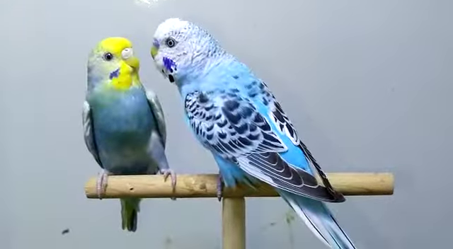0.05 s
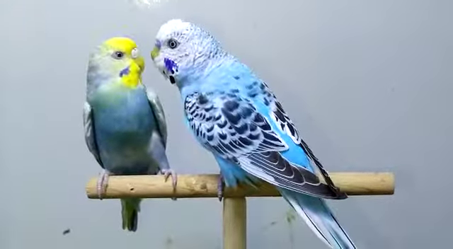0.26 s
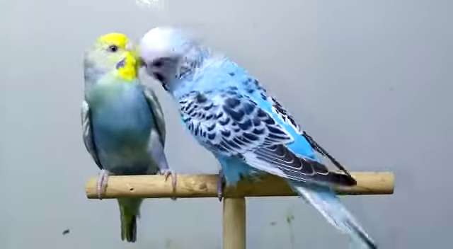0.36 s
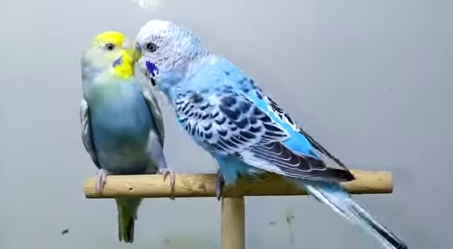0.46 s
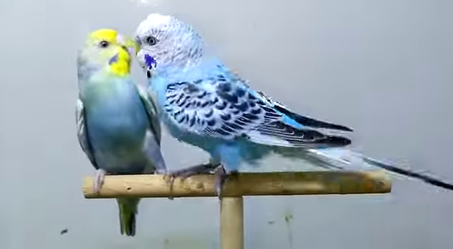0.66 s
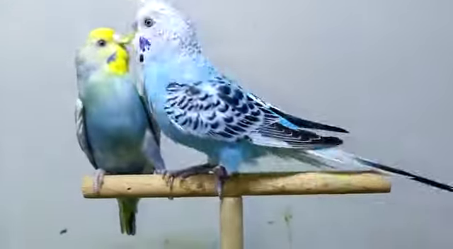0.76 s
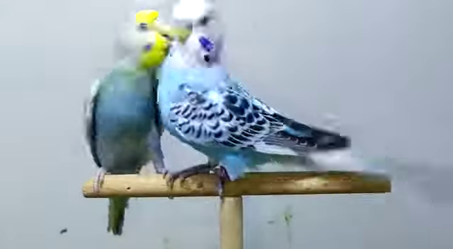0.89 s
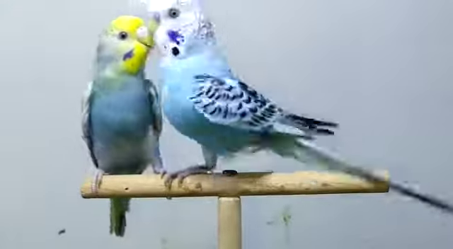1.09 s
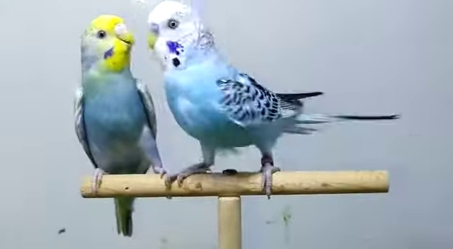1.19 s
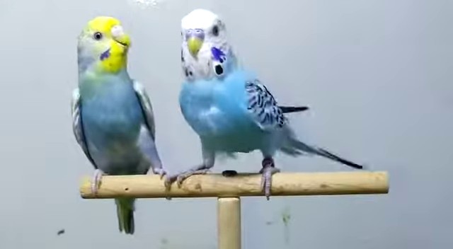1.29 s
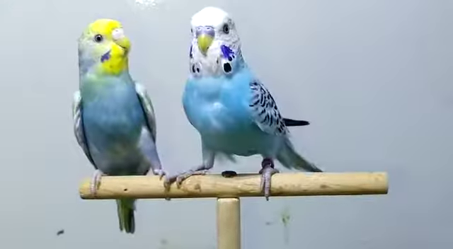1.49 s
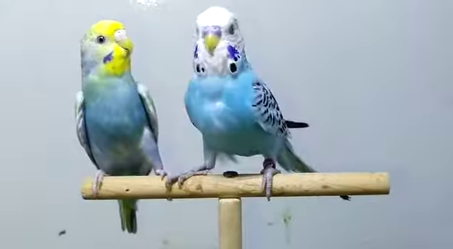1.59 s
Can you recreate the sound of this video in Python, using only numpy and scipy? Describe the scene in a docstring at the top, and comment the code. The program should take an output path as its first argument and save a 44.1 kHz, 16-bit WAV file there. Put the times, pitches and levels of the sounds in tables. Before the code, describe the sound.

A budgerigar squawks once loudly amid soft chirps, over a low uneven rumble.

```python
"""Two budgerigars in a bare room

Two birds court on a perch, each voice driven by the vibrating membrane of its syrinx. One close
squawk overloads the input; softer chirps and warbles arrive mostly as reverberation. Feathers
rustle, claws and beaks tick, and an uneven rumble with low thumps buffets mainly the left microphone."""
import sys
import numpy as np
from scipy import signal
from scipy.fft import rfft, irfft, next_fast_len
from scipy.io import wavfile
from scipy.ndimage import uniform_filter1d

SR = 44100
rng = np.random.default_rng(int(sys.argv[2]) if len(sys.argv) > 2 else 0)


def unload_wav(signal):
    """Save mono or channel-first audio to the path in sys.argv[1] as 16-bit WAV at rate SR, clipped to [-1, 1]."""
    wavfile.write(
        sys.argv[1],
        SR,
        np.round(np.clip(np.atleast_2d(signal).T, -1, 1) * 32767).astype(np.int16),
    )


N = 72765
LEAD = int(.2 * SR)  # lead-in, so that the room already rings at time zero
T = np.arange(-LEAD, N) / SR
BUFFET_RIGHT_DB = -19  # rumble and thumps, right against left


def squawk():
    """Nonlinear oscillation: a close call leaps between harmonic tones, period doubling and rasp."""
    # Course of the call: time_s, pitch_hz, first_db, second_db, third_db (harmonics), roughness
    contour = [(0.387, 2750, -22, -19.5, -20.5, .4), (0.397, 2758, -16, 1.5, 0.5, 0.05),
               (0.404, 2771, -7.5, 7, -5.5, 0.13), (.411, 3044, -21, -5.5, 1.5, 0.1),
               (0.426, 3309, -17, -3.5, -30, 0.3), (0.43, 3344, 5.5, -25, -20, 0),
               (.438, 3840, -2.5, -0.5, -23, .3), (.451, 3593, 4, -19, -11.5, 1.19),
               (0.459, 2745, -7.5, -6, -17, 0.31), (0.47, 2823, -10, -8.5, -5.5, 0.1),
               (.481, 2640, -1, -3, -7.5, 0.7), (0.485, 3771, 8, -20, -25.5, 0.42),
               (.491, 3505, 5, -27.5, -18.5, 0), (0.5, 3677, -2.5, -12.5, -30, 0),
               (.502, 2702, -9, -10.5, -21.5, 0.29), (.521, 3130, 0.5, -26.5, -11, 0.04),
               (0.545, 3329, 3, -15, -6, .15), (0.55, 3635, 4, -4.5, -29.5, 1.11),
               (0.555, 3462, -3, -29.5, -49.5, 0.92), (0.566, 3230, -8.5, -33, -38.5, .7)]
    # Breaks to half pitch: centre_s, length_s, level_db against the fundamental
    breaks = [(.493, .021, -8)]
    # Partials of a break: pitch_multiple, level_db
    break_partials = [(.5, 0), (1.5, -10), (2.5, -3)]
    # Spectrum of the breath noise: frequency_hz, level_db
    rasp_spectrum = [(1100, -25), (1700, -10), (3600, 3.5), (4900, -7.5), (8500, 4), (10800, -18.5),
                     (14000, -31.5), (16000, -23.5)]
    hz, first_db, second_db, third_db, roughness = in_time(contour)
    phase, strength = syrinx(hz, roughness)
    fundamental = from_db(first_db) * np.sin(phase)
    fourth_db = third_db - 25.5
    overtones = sum(from_db(db) * np.sin(k * phase)
                    for k, db in enumerate([second_db, third_db, fourth_db], 2))
    break_level = sum(from_db(first_db + db) * swell(centre - length / 2, length, edge_s=length / 2)
                      for centre, length, db in breaks)
    half_pitch = break_level * sum(from_db(db) * np.sin(k * phase) for k, db in break_partials)
    start, end = contour[0][0], contour[-1][0]
    envelope = from_db(-5) * swell(start, end - start, edge_s=.0088)
    voice = envelope * (place(strength * fundamental, pan_db=-5, lag_s=.000125)
                        + place(strength * (overtones + half_pitch), pan_db=1, lag_s=.00017))
    voice_level = envelope * np.hypot(from_db(first_db), from_db(second_db))
    rasp_level = from_db(-7.5) * voice_level * (.42 + roughness)  # some breath even in clean tones
    rasp = rasp_level * stereo_noise(rasp_spectrum)
    return voice + wall(voice) + rasp + room(from_db(-28) * voice + from_db(-13) * rasp, build_s=.052)


def syrinx(hz, roughness):
    """Frequency and amplitude modulation: roughness shakes the membrane's phase and strength."""
    jitter, shimmer, wander_hz = .1 * roughness, .55 * roughness, 590
    phase = 2 * np.pi * np.cumsum(hz * (1 + jitter * drift(wander_hz))) / SR
    strength = np.sqrt(2) * (1 + shimmer * drift(wander_hz)) / np.sqrt(1 + shimmer ** 2)
    return phase, strength


def chirps():
    """Source and filter: soft gliding notes of the syrinx are shaped by the throat's resonances."""
    # Notes: start_s, length_s, start_hz, end_hz, level_db, overtone_db, roughness, direct_db
    notes = [(-.09, 0.094, 2908, 2274, -38.5, 11, 1.19, -8), (.14, .07, 3147, 3294, -36.5, -28, .45, 2.5),
             (.16, 0.12, 2380, 2090, -44, -24, 0.92, -0.5), (0.653, 0.075, 2140, 2337, -44, -6, 1.1, 1),
             (0.949, .08, 1098, 1441, -52, -35, 1.14, -0.5), (1.059, 0.06, 1382, 1717, -43, -30.5, 0.31, 0),
             (1.133, .06, 1847, 2210, -47, -12, 0.45, -1.5),
             (1.136, 0.084, 2926, 3097, -48, -24, 0.41, -6.5),
             (1.183, 0.16, 2242, 2370, -48.5, -18, 0.58, -0.5),
             (1.44, 0.13, 3675, 3280, -39.5, -6, 0.712, -10.5),
             (1.46, 0.035, 3584, 3014, -39, -16.5, 0.12, 2),
             (1.556, .11, 2604, 2187, -42.5, -6, 0.81, -5.5)]
    # Response of the throat: frequency_hz, gain_db
    throat = [(3600, 0), (5500, -9), (9500, 8), (10900, -26.5), (13000, -9.5), (15000, -28)]
    attack_s, release_s = .005, .02
    radiated, direct = 0, 0
    for start, length, start_hz, end_hz, level_db, overtone_db, roughness, direct_db in notes:
        glide_hz = np.interp(T, [start, start + length], [start_hz, end_hz])
        phase, strength = syrinx(glide_hz, roughness)
        upper = from_db(-6.5) * (np.sin(4 * phase) + np.sin(5 * phase))
        overtones = np.sin(2 * phase) + np.sin(3 * phase) + upper
        source = strength * (np.sin(phase) + from_db(overtone_db) * overtones)
        rise, fall = (T - start) / attack_s, (start + length - T) / release_s + .5
        envelope = np.clip(np.minimum(rise, fall), 0, 1)
        note = from_db(level_db) * envelope * coloured(source, throat)
        radiated += note
        direct += from_db(direct_db) * note
    return place(direct, pan_db=9) + room(place(radiated, pan_db=-1))


def feathers():
    """Friction noise: feathers slide with a high, grainy rustle as the birds shift."""
    # Rustles: start_s, length_s, level_db
    rustles = [(0.351, 0.071, -48.5), (.787, 0.08, -43.5), (0.874, 0.33, -51.5)]
    # Spectrum of the friction: frequency_hz, level_db
    spectrum = [(3000, -27.5), (6500, -26.5), (8600, -2), (10500, -16), (15500, -26.5)]
    envelope = sum(from_db(db) * swell(start, length, edge_s=.0097) for start, length, db in rustles)
    grain = from_db(2.5 * drift(hz=130))
    direct = place(envelope * grain * noise(spectrum), pan_db=2)
    return direct + from_db(4) * room(direct)


def ticks():
    """Damped impacts: claws and beaks click, the wooden perch knocks, and both decay exponentially."""
    # Impacts: start_s, click_db, knock_db
    impacts = [(0.307, -36, -75), (.641, -55, -31), (.972, -43.5, -48.5), (1.123, -38.5, -51),
               (1.167, -33, -33)]
    # Spectrum of a click: frequency_hz, level_db
    click_spectrum = [(1500, -16), (8700, 0), (11000, -7)]
    # Spectrum of the struck perch: frequency_hz, level_db
    knock_spectrum = [(300, -1), (480, 12.5), (1050, 2), (1600, -14.5), (4000, -39)]
    click_t60_s, knock_t60_s = .016, .1
    click, knock, strikes = noise(click_spectrum), noise(knock_spectrum), 0
    for start, click_db, knock_db in impacts:
        age = np.maximum(T - start, 0)
        strikes += (T > start) * click * from_db(click_db - 60 * age / click_t60_s)
        strikes += (T > start) * knock * from_db(knock_db - 60 * age / knock_t60_s)
    direct = place(strikes, pan_db=2)
    return direct + from_db(-1.5) * room(direct)


def rumble():
    """Amplitude-modulated noise: an uneven low buffeting, strong on the left and faint on the right."""
    # Envelope on the left: time_s, level_db
    envelope = [(0, -34.5), (.13, -24), (.225, -16), (.26, -35.5), (.31, -18), (.405, -20.5), (.43, -6.5),
                (.48, -11.5), (.53, -2.5), (.575, -24.5), (.76, -48.5), (.81, -25.5), (1.08, -37.5),
                (1.125, -21.5), (1.33, -17.5), (1.42, -25.5), (1.6, -24), (1.65, -20.5)]
    # Spectrum of the buffeting: frequency_hz, level_db
    spectrum = [(20, -20), (50, -10), (85, 1), (180, -3.5), (400, -24), (700, -53), (3000, -94)]
    window_s = .03
    level_db, = in_time(envelope)
    buffeting = stereo_noise(spectrum)
    power = uniform_filter1d(buffeting ** 2, int(window_s * SR))
    power = uniform_filter1d(power, int(window_s * SR / 2))
    steady = buffeting / np.sqrt(power)  # evened out, so that the envelope sets the surges
    return steady * from_db(level_db) * from_db([[0], [BUFFET_RIGHT_DB]])


def thumps():
    """Gaussian wave packets: low bumps of a cycle or two stand out of the rumble, mainly on the left."""
    # Bumps: centre_s, peak_db
    bumps = [(.128, -7.5), (.202, -4), (.427, 9), (0.499, -12.5), (0.524, -6), (0.795, -20), (.874, -11),
             (0.917, -12.5), (1.127, -12.5), (1.162, -14), (1.277, -13), (1.355, -4.5), (1.365, -4),
             (1.533, -8), (1.619, -7)]
    pitch_hz, width_cycles = 155.4, .71
    pressure = 0
    for centre, peak_db in bumps:
        cycles = (T - centre) * pitch_hz
        envelope = from_db(peak_db) * np.exp(-(cycles / width_cycles) ** 2)
        pressure += envelope * np.cos(2 * np.pi * (cycles + rng.random()))
    return pressure * from_db([[0], [BUFFET_RIGHT_DB]])


def wall(x):
    """Early reflections: dense echoes from the wall behind the perch interfere and blur the call."""
    t60_s = .063
    t = np.arange(SR // 20) / SR
    echoes = rng.standard_normal((2, len(t))) * from_db(-60 * t / t60_s)
    echoes /= np.linalg.norm(echoes, axis=1, keepdims=True)
    return from_db(-5) * signal.fftconvolve(x, echoes, axes=1)[:, :len(T)]


def room(x, build_s=.00093):
    """Diffuse reverberation: the field builds up, then each band decays at its own rate."""
    # Reverberation time: frequency_hz, t60_s
    decay_times = [(300, 0.299), (2500, 0.69), (9000, 0.52)]
    # Colour of the reverberation: frequency_hz, gain_db
    colour = [(300, -10.5), (2000, 1.5), (5500, 0.5), (8500, -8.5), (11500, 6.5), (15000, -3)]
    t, edges_hz, tail = np.arange(SR) / SR, np.geomspace(200, 16000, 13), 0
    white = rng.standard_normal((2, 2, SR))
    for k, (low, high) in enumerate(zip(edges_hz, edges_hz[1:])):
        hz = np.sqrt(low * high)
        envelope = from_db(-60 * t / at_hz(decay_times, hz)) * (1 - np.exp(-t / build_s))
        bandpass = signal.butter(2, [low, high], "band", fs=SR, output="sos")
        band = signal.sosfilt(bandpass, white[k % 2])  # adjacent bands are uncorrelated
        tail += band * envelope / np.linalg.norm(envelope) * from_db(at_hz(colour, hz))
    return signal.fftconvolve(x, tail, axes=1)[:, :len(T)]


def room_tone():
    """Stationary noise: the quiet of the room, mostly low with a faint hiss."""
    # Spectrum of the background: frequency_hz, level_db
    spectrum = [(25, -8.5), (110, 9), (500, -23.5), (4000, -41.5), (9000, -23), (15000, -97)]
    return from_db(-36.5) * stereo_noise(spectrum)


def place(x, pan_db, lag_s=-.00045):
    """Level and time differences: positive pan favours the left; positive lag delays the left."""
    left, right = [np.pad(x, (max(round(lag * SR), 0), 0))[:len(x)] for lag in (lag_s, -lag_s)]
    return np.array([left * from_db(pan_db / 2), right * from_db(-pan_db / 2)])


def swell(start_s, length_s, edge_s):
    """Envelope with a quarter-sine rise and fall."""
    return np.sin(np.pi / 2 * np.clip(np.minimum(T - start_s, start_s + length_s - T) / edge_s, 0, 1))


def drift(hz):
    """Low-pass noise: a random wander of unit spread."""
    x = signal.sosfilt(signal.butter(2, hz, fs=SR, output="sos"), rng.standard_normal(len(T)))
    return x / x.std()


def noise(spectrum):
    """Coloured noise of unit rms."""
    x = coloured(rng.standard_normal(len(T)), spectrum)
    return x / x.std()


def stereo_noise(spectrum):
    """Incoherent noise at the two microphones."""
    return np.array([noise(spectrum), noise(spectrum)])


def coloured(x, spectrum):
    """Zero-phase filtering by a spectrum."""
    size = next_fast_len(len(x) + LEAD)
    gain = from_db(at_hz(spectrum, np.fft.rfftfreq(size, 1 / SR)))
    return irfft(rfft(x, size) * gain, size)[:len(x)]


def at_hz(points, hz):
    """Interpolation on a log-frequency axis."""
    frequencies, values = np.transpose(points)
    return np.interp(np.log(hz + 1e-9), np.log(frequencies), values)


def in_time(rows):
    """Linear interpolation of each column over time."""
    times, *columns = np.transpose(rows)
    return [np.interp(T, times, column) for column in columns]


def from_db(db):
    """Decibels to amplitude ratio."""
    return 10 ** (np.asarray(db) / 20)


def scene():
    """Superposition: birds, buffeting and the quiet of the room add at the microphones."""
    background = room_tone()
    return (squawk() + chirps() + feathers() + ticks() + rumble() + thumps() + background)[:, LEAD:]


def record(dry):
    """Saturation: the overloaded input rounds off peaks, then a steep low-pass cuts the top."""
    knee, cutoff_hz = 5, 15600
    clipped = dry / (1 + np.abs(dry) ** knee) ** (1 / knee)
    return signal.sosfilt(signal.ellip(10, .1, 70, cutoff_hz, fs=SR, output="sos"), clipped)


dry = scene()
out = record(dry)
unload_wav(out)
```